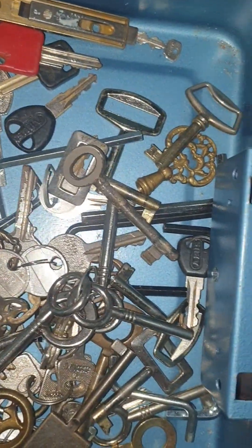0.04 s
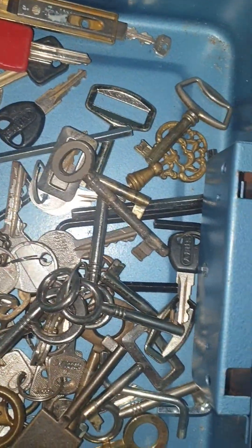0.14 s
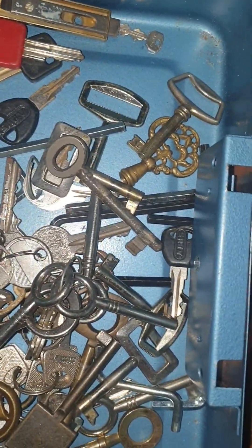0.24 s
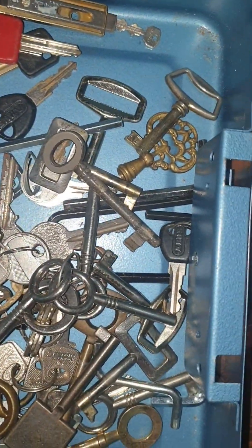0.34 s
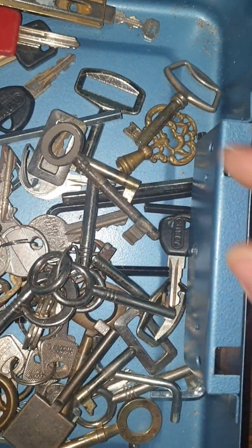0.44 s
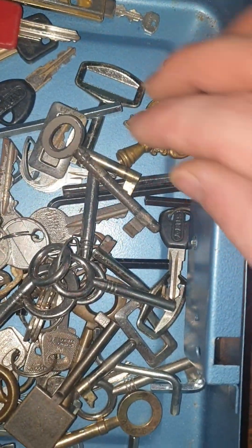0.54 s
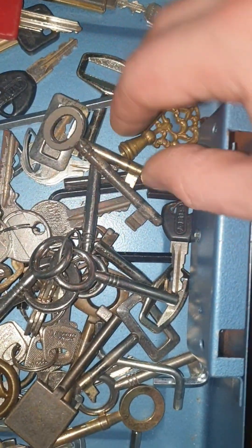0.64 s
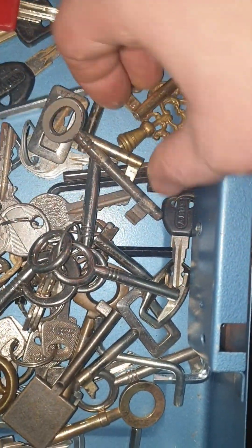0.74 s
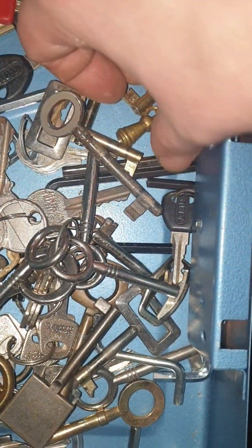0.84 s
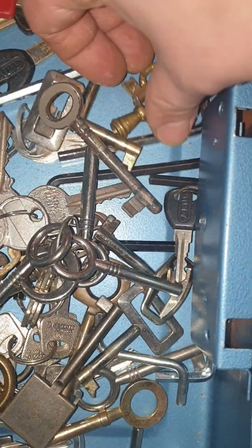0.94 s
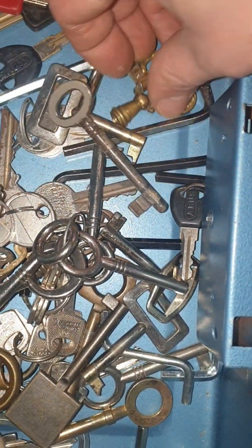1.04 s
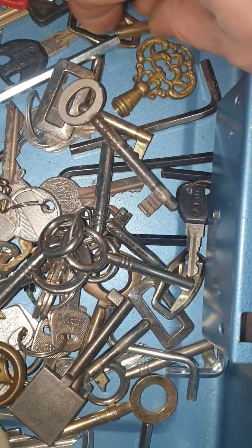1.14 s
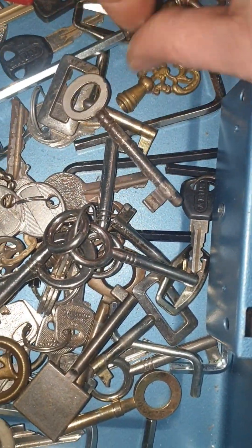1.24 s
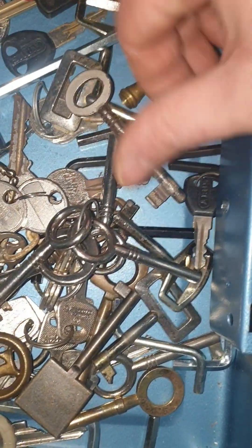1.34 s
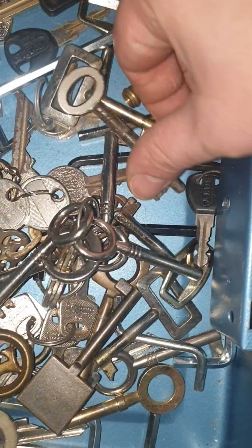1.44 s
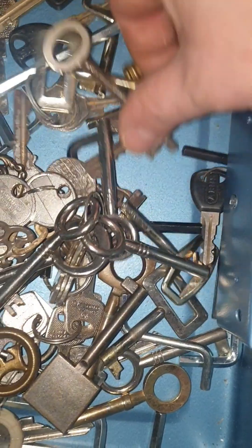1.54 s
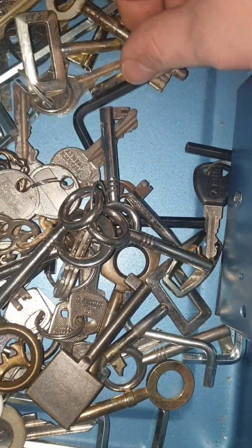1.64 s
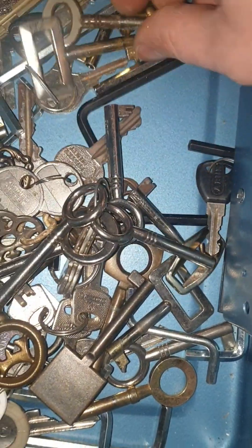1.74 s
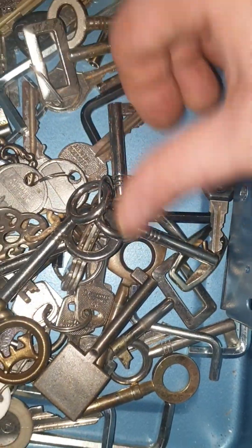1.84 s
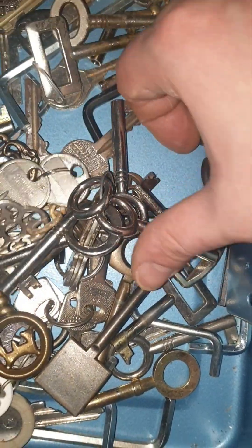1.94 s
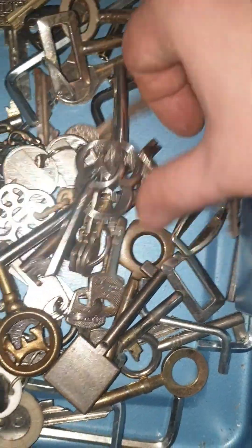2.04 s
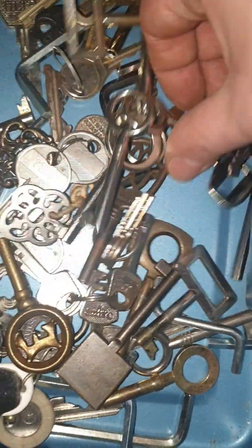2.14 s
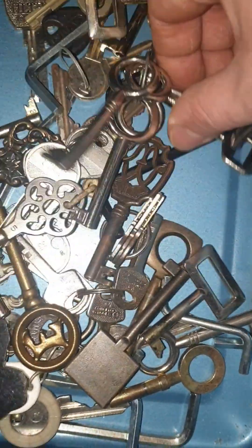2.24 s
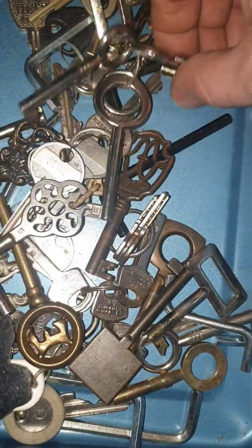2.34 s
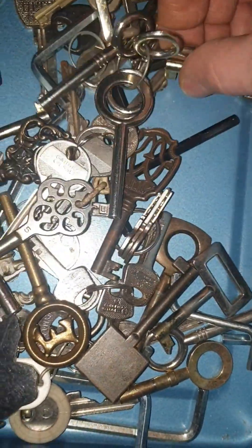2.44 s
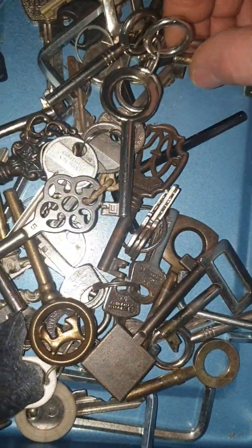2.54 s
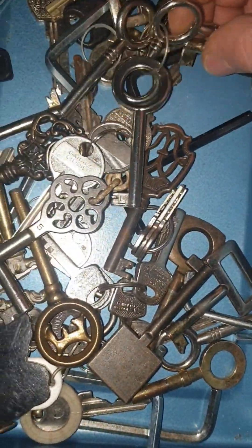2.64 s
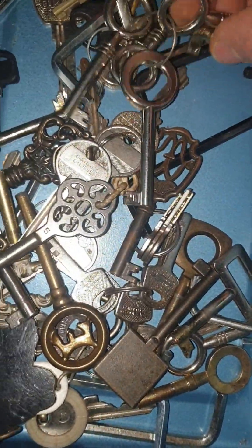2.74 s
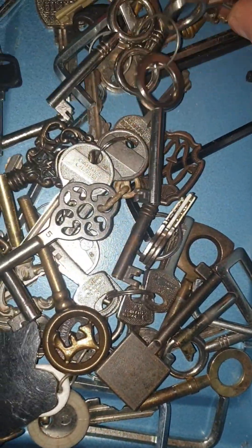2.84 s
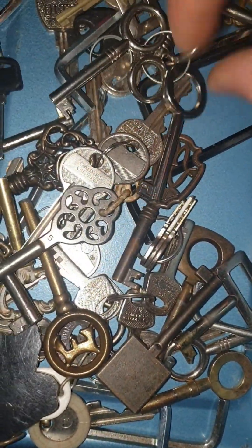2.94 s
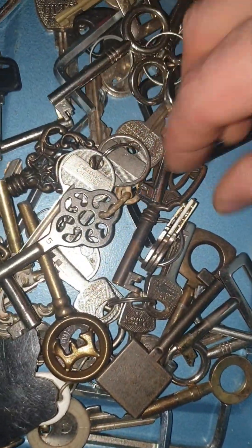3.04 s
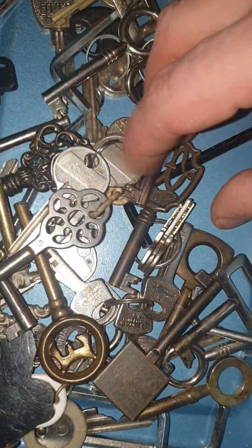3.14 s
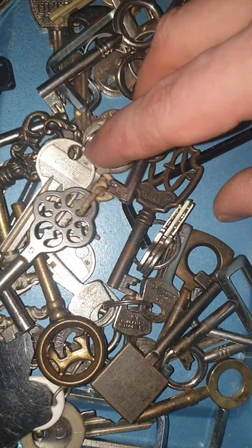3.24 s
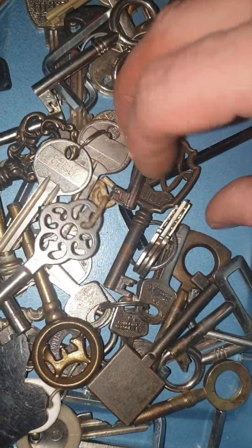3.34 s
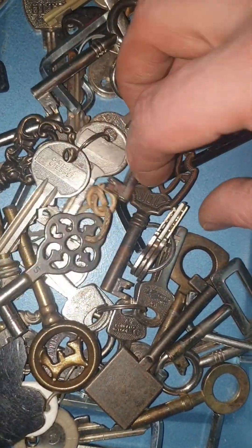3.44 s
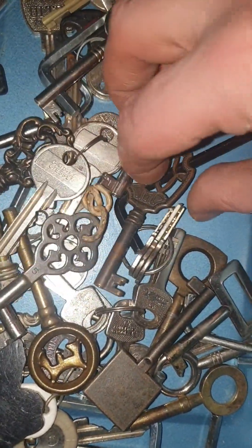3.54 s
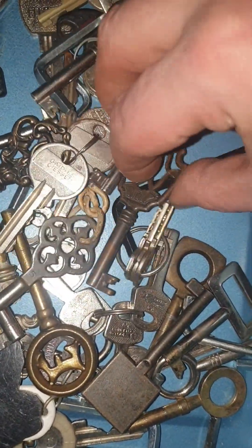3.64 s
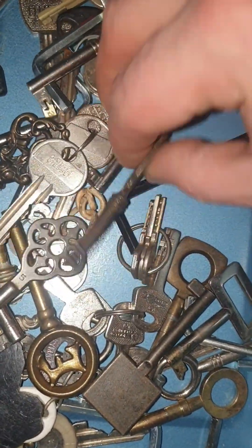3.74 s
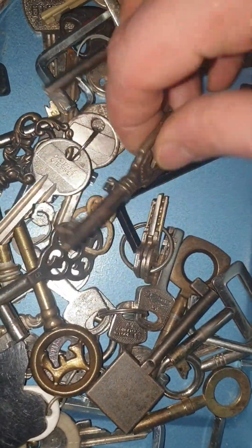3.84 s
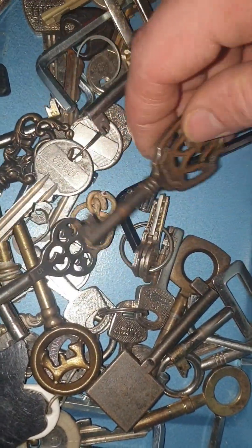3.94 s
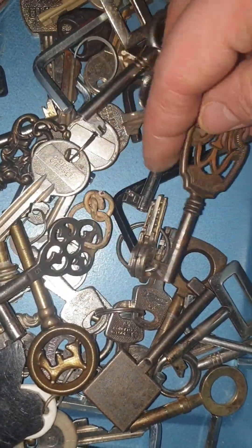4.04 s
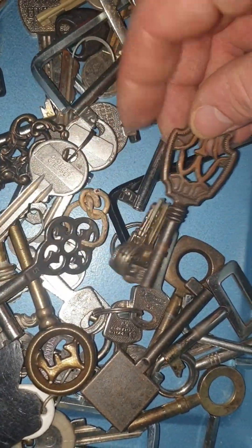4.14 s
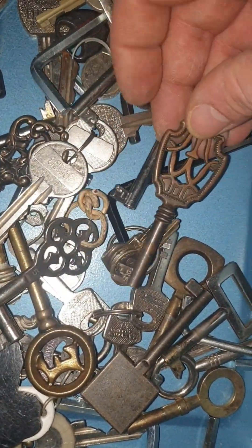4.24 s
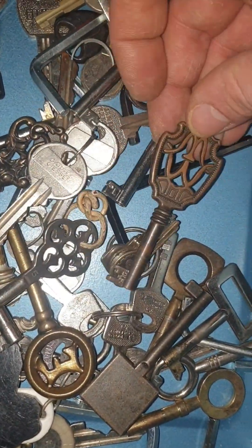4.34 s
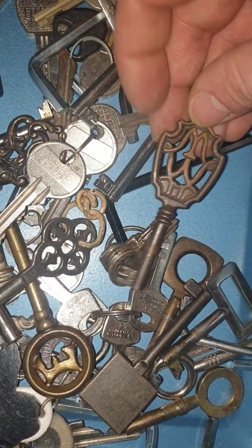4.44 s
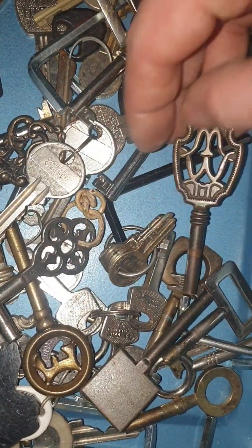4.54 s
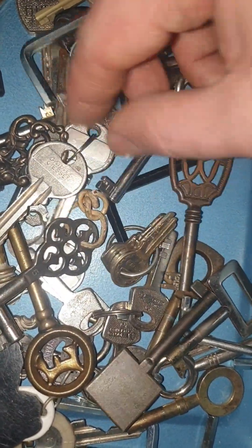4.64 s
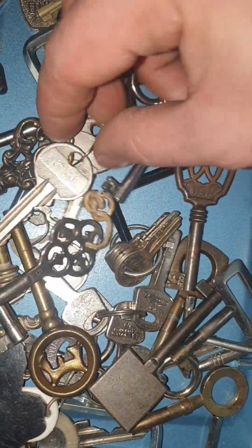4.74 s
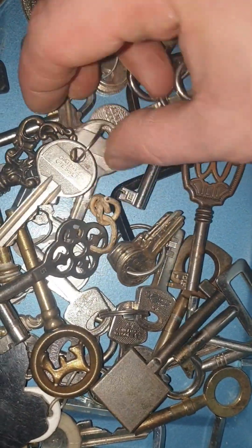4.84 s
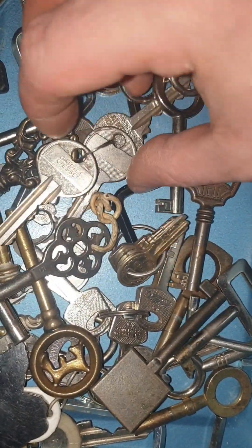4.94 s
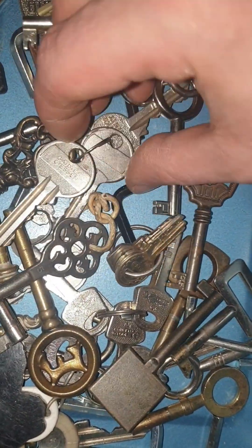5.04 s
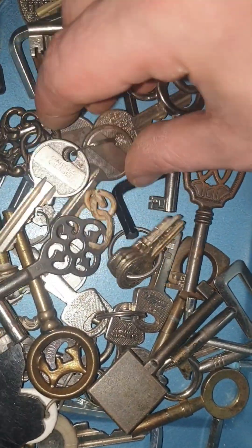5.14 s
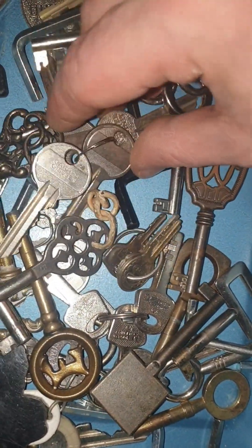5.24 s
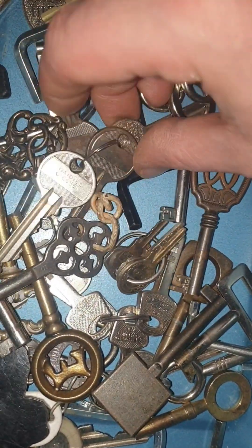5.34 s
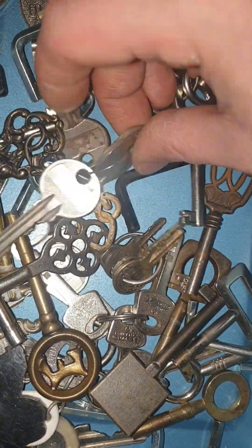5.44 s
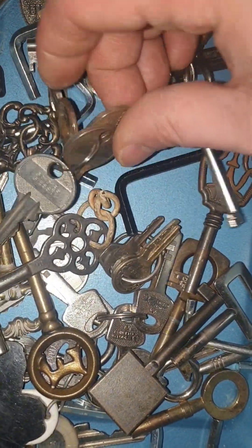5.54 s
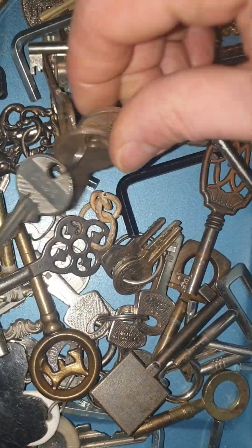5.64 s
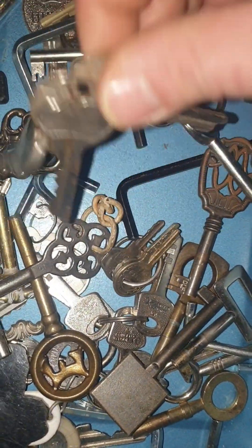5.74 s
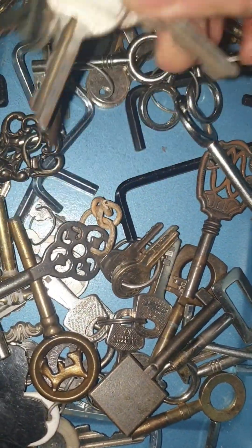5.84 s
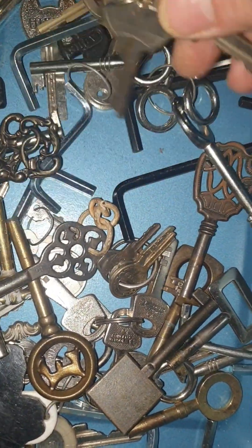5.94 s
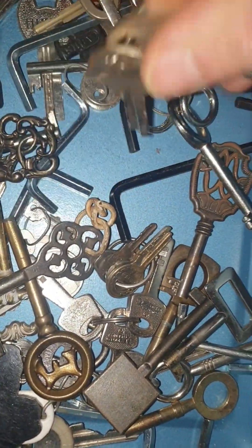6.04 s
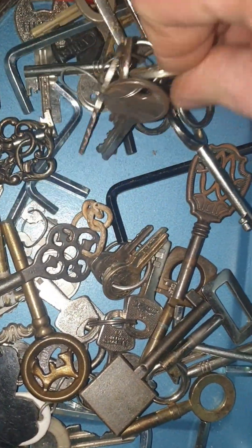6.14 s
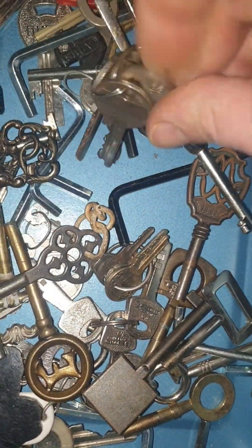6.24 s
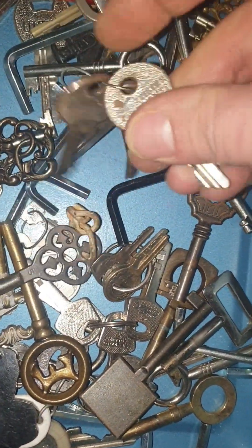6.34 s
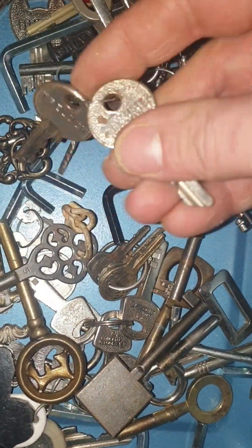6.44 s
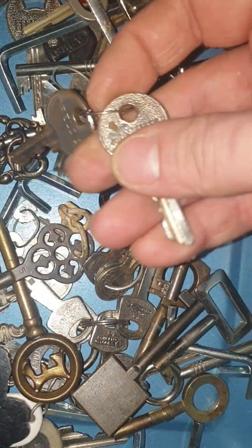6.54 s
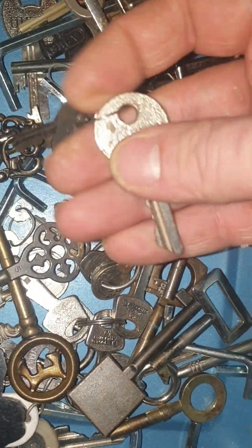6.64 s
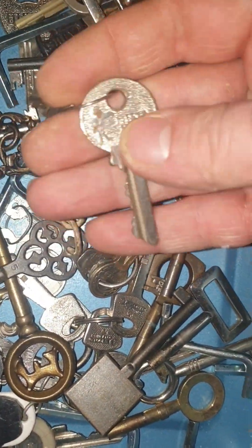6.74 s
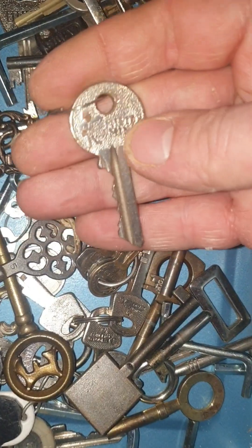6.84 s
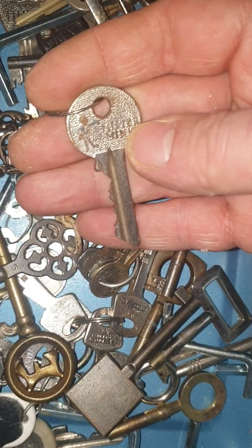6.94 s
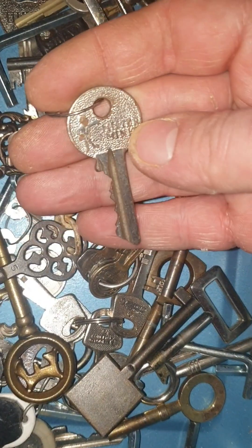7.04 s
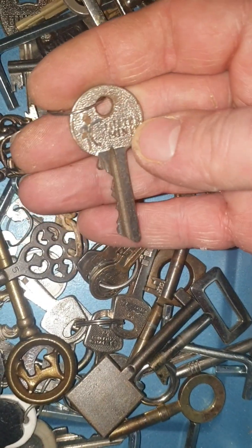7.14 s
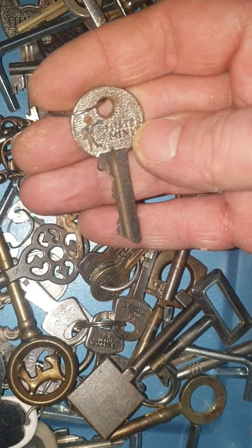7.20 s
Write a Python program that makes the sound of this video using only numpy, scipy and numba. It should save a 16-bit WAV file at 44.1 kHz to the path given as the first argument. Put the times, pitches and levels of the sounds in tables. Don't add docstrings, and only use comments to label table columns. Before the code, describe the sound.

A hand digs in a pile of old keys in a sheet-metal box, heard very close. Hard, bright clanks and rattling slides come first, then a bunch is lifted and dropped, a long key is dragged out more quietly, and flat keys are picked up with thin ringing tings. A last jingle settles into near silence. Short metallic box tail, quiet room, low handling rumble.

```python
import sys
import numpy as np
from numba import njit
from scipy import signal
from scipy.fft import rfft, irfft
from scipy.io import wavfile

SR = 44100
rng = np.random.default_rng(int(sys.argv[2]) if len(sys.argv) > 2 else 0)


def boost_factor(decibels):
    exponent = np.asarray(decibels, float) / 20
    return 10 ** exponent


def wav_out(sig):
    wavfile.write(sys.argv[1], SR, np.round(np.clip(np.atleast_2d(sig).T, -1, 1) * 32767).astype(np.int16))


N = 320607


def curve(table, hz):
    f, v = np.transpose(table)
    return np.interp(np.log(np.maximum(hz, 1)), np.log(f), v)


def unit(x):
    return x / np.sqrt(np.mean(x ** 2))


def band_noise(low_hz, high_hz):
    sos = signal.butter(3, [low_hz, high_hz], "bandpass", fs=SR, output="sos")
    return unit(signal.sosfilt(sos, rng.standard_normal(N)))


def swells(t, s, db, rise_s, held_s, fall_s, floor_db):
    since = t[:, None] - s
    off = np.maximum(-since / rise_s, 0) + np.maximum((since - held_s) / fall_s, 0)
    return np.maximum(np.max(db - 20 * off, axis=1), floor_db)


@njit(fastmath=True)
def ring(start, stop, pole, gain, soft, size):
    left, right = np.zeros(size), np.zeros(size)
    for m in range(len(start)):
        z, a, b, p, push = 1 + 0j, gain[0, m], gain[1, m], pole[m], 1.
        fade = min(6., np.log(1e5 * (abs(a) + abs(b))))
        for i in range(start[m], min(size, start[m] + int(-fade / np.log(abs(p))))):
            w = (1 - push) * z
            left[i] += a.real * w.imag + a.imag * w.real
            right[i] += b.real * w.imag + b.imag * w.real
            z *= p if i < stop[m] else .9975 * p
            push = push * soft[m] + 1e-30
    return np.stack((left, right))


# frequency in Hz, left minus right in dB.
PORT_BALANCE = [(60, -2.0), (110, 0.0), (200, -6), (380, 21.5), (700, 2.5), (1290, 12), (2380, 4),
                (4400, 1), (8120, 13.5), (11000, 9), (13000, -4)]


def strike(s, hz, db, t60, pan_db, turn, until=np.inf):
    rows = np.broadcast_arrays(s, hz, db, t60, pan_db, turn, until)
    s, hz, db, t60, pan_db, turn, until = (a.ravel() for a in rows)
    early = -2 * np.pi * hz * 0.0002457
    part = early + 2 * np.pi * turn * np.clip(hz / 1500, 0, 1) ** 4
    lean_db = (curve(PORT_BALANCE, hz) + pan_db) / 2
    left = boost_factor(db + lean_db) * np.exp(-.5j * part)
    right = boost_factor(db - lean_db) * np.exp(.5j * part)
    pole = np.exp(2j * np.pi * hz / SR - np.log(1000) / (t60 * SR))
    soft = np.exp(-1 / (SR * (0.0001 + 0.45 / hz)))
    return ring((s * SR).astype(np.int64), until * SR, pole, np.array([left, right]), soft, N)


# frequency in Hz, level in dB per Hz.
PILE_COLOUR = [(88, -45), (150, -78.5), (317, -8), (349, -17), (518, 12), (916, 15), (1560, 9), (1970, 14),
               (3700, 5.5), (4970, 4.5), (7000, -4), (8200, -17), (9300, -6), (10700, 0.5), (11600, -5.5),
               (15300, -13.5), (16500, -38)]


def handful(s, low_db, mid_db, top_db, pan_db, t60_s, scatter_db, chatter_s, count):
    u, v, w, late, turn = rng.random((len(s), 5, count)).transpose(1, 0, 2)
    hz = 260 + 15600 * ((np.arange(count) + u) / count) ** 1.6
    late = np.take_along_axis(late, (late[:, ::-1] * 5).astype(int), axis=1)
    wait = -np.log(1 - late)

    low = 1 / (1 + (hz / 1500) ** 4)
    top = 1 / (1 + (8000 / hz) ** 8)
    zone_db = low * low_db[:, None] + top * top_db[:, None] + (1 - low - top) * mid_db[:, None]
    t60 = np.clip(t60_s * (hz / 2000) ** -.2 * np.exp(0.99 * (w - .5)), .003, .2)
    share_db = 7.8 * np.log10(hz / 2000) - 10 * np.log10(t60 / t60_s * count)
    db = zone_db + curve(PILE_COLOUR, hz) + share_db + scatter_db * np.log(1 - v)
    start = s[:, None] + chatter_s * (1 - .6 * low) * wait
    return strike(start, hz, db - 2.23 * wait, t60, pan_db[:, None], turn - .5)


# frequency in Hz, level in dB per Hz.
HUSH_COLOUR = [(18, -29), (30, 1), (53, -3), (103, -26), (540, -35), (16000, -43)]


def hush():
    shape = boost_factor(curve(HUSH_COLOUR, np.fft.rfftfreq(N, 1 / SR)))
    return boost_factor(-85) * unit(irfft(rfft(rng.standard_normal((2, N))) * shape, N))


# start in seconds, peak in dB, box thud in dB re peak, treble in dB re peak.
TOUCHES = [(0.065, -56, 0, 0), (0.694, -14, -4, -2), (0.891, -36, -9, 3), (1.116, -9, -4, -6),
           (1.213, -26, -7, 3), (1.538, -8, -13, -9), (1.573, -7, -16, -3), (1.617, -7, -13, 1),
           (1.635, -9, -4, 0), (1.642, -12, -14, -1), (1.781, -30, -6, -13), (1.846, -28, -21, -17),
           (2.068, -4, -13, 0), (2.083, -10, -6, 9), (2.104, -17, -12, 0), (2.115, -18, -13, 7),
           (2.16, -15, -1, 2), (2.284, -20, -14, -15), (2.578, -37, -4, -18), (2.746, -25, -6, -1),
           (2.773, -15, 0, 2), (2.834, -25, -16, 2), (2.909, -11, -8, 1), (2.928, -15, -7, 13),
           (3.099, -26, -11, -1), (3.353, -33, 2, 5), (3.446, -28, -2, -13), (3.584, -33, -16, 4),
           (3.63, -30, -2, -8), (3.652, -23, -12, -5), (3.73, -23, -9, -10), (3.8, -35, 3, 4),
           (3.839, -16, -13, -3), (3.864, -21, -6, -8), (3.877, -25, 5, 4), (3.939, -30, 2, 10),
           (4.088, -28, -17, 4), (4.147, -27, 3, 8), (4.864, -21, -11, -9), (4.876, -21, -4, 4),
           (5.098, -25, -10, 16), (6.061, -34, -20, 17), (6.114, -40, -15, 16), (6.143, -6, -5, -3),
           (6.154, -11, -8, 5), (6.357, -35, -11, 22), (6.584, -30, -4, -19), (6.71, -26, -3, 6),
           (6.874, -32, -12, -7)]


def touches():
    s, db, thud, bright = np.transpose(TOUCHES)
    side = 3 * rng.standard_normal(len(s))
    return handful(s, db + thud + 1.5, db + 1.5, db + bright + 1.5, side, .018, 2.5, .002, count=70)


# start in seconds, boom in dB, held time in seconds.
LEANS = [(.07, -68, .02), (.45, -71, 0), (.66, -53, .51), (1.45, -51, .05), (1.82, -47, 0),
         (1.96, -50, .39), (2.9, -55, .06), (3.18, -62, .45), (3.8, -57, .21), (4.625, -47, 0),
         (4.83, -56, .34), (5.35, -54, .22), (6.16, -54, 0)]


def lean():
    boom, spread = band_noise(86, 120), band_noise(110, 850)
    now = np.arange(N) / SR
    steps = now[::128]
    s, db, held_s = np.transpose(LEANS)
    resting = (steps < .48) | ((steps > .6) & (steps < 6.6))
    level_db = swells(steps, s, db, .055, held_s, .14, np.where(resting, -83, -100))
    level = np.interp(now, steps, boost_factor(level_db))
    return level * (boom + boost_factor(6) * spread * np.array([[.8], [1.1]]))


# start in seconds, rattle in dB, build-up and settling in seconds per 20 dB.
SLIDES = [(.705, -27, .05, .12), (1.16, -27.5, .37, .125), (1.548, -9, .065, .11), (1.629, -15, .11, .14),
          (1.86, -44, .11, .11), (2.068, -10, .08, .18), (2.35, -25, .22, .07), (2.63, -39.5, .38, .11),
          (2.778, -16.5, .052, .09), (2.922, -7, .035, .06), (3.08, -35, .015, .75),
          (3.851, -23.5, .3, .135), (4.15, -30.5, .33, .062), (4.631, -9, .015, .06),
          (4.92, -21.5, .18, .063), (5.13, -30, .095, .105), (5.31, -33, .11, .125), (5.51, -26, .17, .3),
          (6.15, -15, .015, .07), (6.3, -45, .06, .6)]


def rattle():
    at, db, rise_s, fall_s = np.transpose(SLIDES)
    u, v, w, bright = rng.random((3600, 4)).T
    begin_s, end_s, still_db = .601, 7., -62
    s = begin_s + (end_s - begin_s) * u
    uneven_db = np.minimum(-3.0 * np.log(1 - v), 8)
    body = swells(s, at, db, rise_s, 0, fall_s, still_db) + uneven_db
    top = body - 9 + 10 * (bright - .5)
    return handful(s, body - 9, body - 6, top, 6 * (w - .5), 0.0097, 2, .0015, count=20)


# start in seconds, strength in dB, box thud in dB re strength, treble in dB re strength.
DIG_KNOCKS = [(.646, -18, -16.5, 5.5), (.688, -19, -14, -4), (.752, -27, -11.5, -4),
              (.833, -35.5, -.5, -1.5), (.917, -30, -11.5, -20), (.939, -21.5, -9.5, -.5),
              (1.012, -31.5, -3, -33.5), (1.055, -24, -9, -.5), (1.104, -22, -4, 0),
              (1.137, -14.5, -14, 2.5), (1.157, -19.5, -4.5, -9), (1.225, -30, -8, -5),
              (1.311, -38, -5, -43), (1.406, -29, -8, -6), (1.441, -15, -14, 7), (1.514, -17, -20, -3),
              (1.553, -28.5, -19.5, 21), (1.598, -11, -17, 2), (1.677, -19.5, -37.5, -6.5),
              (1.724, -30, -6, 12), (1.806, -29, -10, -1), (1.911, -31, -14, 9)]
LIFT_KNOCKS = [(1.949, -44.5, 9.5, 15.5), (1.985, -42.5, -3, 10), (2.014, -21, -9, -5), (2.031, -18, -6, 6),
               (2.052, -13.5, -14, 2.5), (2.147, -19.5, -5.5, 10.5), (2.188, -21.5, -14, -2),
               (2.244, -26, -12, -1), (2.318, -28, -11, -8.5), (2.33, -18, -5, 2.5), (2.43, -29.5, -36, 8),
               (2.444, -22.5, -3.5, 5), (2.474, -30, -14, 3), (2.503, -34, -6.5, -26.5),
               (2.606, -37.5, -5, 8), (2.627, -30.5, -10, 2), (2.726, -29.5, -13.5, 0),
               (2.768, -25, -14, 9.5), (2.812, -36, -28, 5.5), (2.872, -21, -3, 3), (2.895, -19, 0, 13.5),
               (2.997, -35.5, -11, -2)]
DRAG_KNOCKS = [(3.069, -27, -8.5, -7.5), (3.082, -30.5, -13, 1), (3.162, -31, -5.5, 1.5),
               (3.181, -28.5, -4.5, -5), (3.237, -33.5, -2.5, -1), (3.284, -33, -7, 6),
               (3.318, -27, -2, 5.5), (3.408, -47, -5, 1), (3.429, -33, -4, 4), (3.468, -27.5, -4.5, -14),
               (3.531, -29, -15, 1), (3.543, -32.5, -6.5, -24.5), (3.643, -33, -6, -8), (3.704, -39, 6, 0),
               (3.755, -26, -2, -9), (3.827, -30, -1, -4.5), (3.917, -22.5, -7, -4.5), (4., -39, -8, -26),
               (4.021, -39, -2, -7), (4.042, -25.5, -12.5, -8), (4.079, -31, -2.5, -4.5),
               (4.133, -37, -2.5, 4), (4.178, -35, -8, -2)]
PICK_KNOCKS = [(4.288, -54, -4.5, -21.5), (4.306, -49, -6, .5), (4.349, -55.5, 0, -13),
               (4.379, -56, 3.5, -16), (4.438, -46, -6, -8), (4.449, -37.5, -5.5, -4),
               (4.484, -38.5, 2.5, -.5), (4.518, -34, -2, 7), (4.549, -37.5, -.5, -2.5),
               (4.609, -13, -7, .5), (4.627, -17, -15, 3), (4.684, -27, -6, 0), (4.757, -26.5, -9, -1.5),
               (4.818, -17, -7.5, -2), (4.907, -19, -10, -2), (4.952, -16, -11.5, -3),
               (5.038, -31, -21, -4), (5.06, -34, 2.5, -11), (5.092, -22.5, -8.5, 6), (5.122, -27, -5, -47),
               (5.142, -23.5, -8, -5.5), (5.172, -28, -14.5, -5.5), (5.207, -40, -2, -29),
               (5.25, -42, -20, -30), (5.286, -37, 7.5, -11.5), (5.29, -19.5, -15, -5),
               (5.314, -21, -4, -.5), (5.389, -26.5, -12, -1.5), (5.405, -28.5, -4, 6),
               (5.467, -32.5, -5, -3.5)]
RAISE_KNOCKS = [(5.494, -23.5, -5, -.5), (5.511, -25.5, -12, 0), (5.545, -32, -.5, 2),
                (5.619, -19.5, -6.5, -6), (5.648, -32, -36, -7), (5.673, -30, -4.5, 1.5),
                (5.743, -30.5, -10.5, 2), (5.776, -58.5, -11.5, 29.5), (5.816, -23.5, -10, .5),
                (5.902, -56.5, -8.5, 33.5), (5.99, -32, -8, 13), (6.051, -42, -28, 22),
                (6.085, -65, -7.5, 37.5), (6.099, -46, -22, 28.5), (6.135, -11, -6, -.5),
                (6.262, -47, -4, 27), (6.293, -36.5, -14.5, 4), (6.322, -43, -12, 9),
                (6.368, -33.5, -2, 16), (6.412, -28, -6, -4), (6.425, -25, -1, 2.5), (6.461, -27, -2, -3),
                (6.51, -40, -4.5, -1.5), (6.546, -26, -9, 2.5), (6.637, -44, -2, 3), (6.697, -39, -6.5, 14),
                (6.729, -36.5, -7.5, -3.5), (6.804, -65, -21, 29), (6.845, -41, -13, -15),
                (6.863, -34, -3, -3)]
MORE_KNOCKS = [
    (.665, -23, -19, -6),
    (1.451, -10, -15, -7),
    (1.482, -31, -3, 11),
    (1.745, -31.5, -1.5, 4),
    (2.406, -32.5, -11, 6),
    (2.552, -59.5, 2, -9),
    (2.644, -63, 21.5, 3),
    (4.901, -27.5, 4, 7),
    (5.832, -27, -15.5, 1.5),
]


def knocks():
    rows = DIG_KNOCKS + LIFT_KNOCKS + DRAG_KNOCKS + MORE_KNOCKS + PICK_KNOCKS + RAISE_KNOCKS
    s, mid, thud, bright = np.transpose(rows)
    chance = rng.standard_normal((3, len(s)))
    side, low = 2 * chance[0], mid + thud
    splash = bright - 0.2 * np.clip(bright, 0, 30)
    crack = handful(s, low + 11.5, mid + 9, mid + bright + 9, side, 0.011, 3, 0.001, count=40)
    clank = handful(s, low + 6.5, mid + 4, mid + splash + 4, side, 0.041, 2.52, .008, count=110)
    floor = strike(s, 250 * (1 + 0.05 * chance[1]), low - 22 + 4 * chance[2], 0.27, 0, 0)
    return crack + clank, floor


def next_knock(t):
    rows = DIG_KNOCKS + LIFT_KNOCKS + DRAG_KNOCKS + PICK_KNOCKS + RAISE_KNOCKS
    every = np.sort([row[0] for row in rows] + [N / SR])
    return every[np.searchsorted(every, t + .03)]


# start in seconds, rumble in dB, held time in seconds.
SQUEEZES = [
    (.72, -63, .7),
    (1.83, -53, 0),
    (2.05, -33, .27),
    (2.49, -37, 0),
    (2.73, -62, .06),
    (3.05, -60, .3),
    (3.6, -66, .4),
    (4.6, -47, 0),
    (4.74, -68, .3),
    (6.16, -65, 0),
]


def grip():
    right, left = band_noise(38, 84), band_noise(45, 64)
    now = np.arange(N) / SR
    steps = now[::128]
    s, db, held_s = np.transpose(SQUEEZES)
    squeeze = np.interp(now, steps, boost_factor(swells(steps, s, db, .06, held_s, .08, -80)))
    return squeeze * np.array([boost_factor(-41.5) * left, boost_factor(.5) * right])


# start in seconds, frequency in Hz, level in dB, t60 in seconds.
GLINTS = [(1.138, 10300, -26, .04), (1.229, 9776, -48, .13), (1.229, 14600, -49, .12),
          (1.483, 15245, -47, .08), (1.553, 10900, -20, .04), (1.596, 13824, -27, .07),
          (1.676, 9790, -37, .2), (1.677, 14600, -47, .09), (1.68, 11584, -38, .08),
          (1.724, 12532, -43, .07), (1.732, 11930, -40, .05), (1.95, 11200, -39, .04),
          (2.083, 12532, -26, .08), (2.148, 9700, -24, .05), (2.142, 12600, -36, .12),
          (2.156, 14771, -31, .06), (2.225, 14857, -42, .05), (2.331, 14642, -34, .05),
          (2.365, 14000, -52, .2), (2.39, 14800, -48, .15), (2.405, 4300, -38, .07),
          (2.432, 10800, -28, .04), (2.444, 1000, -28, .03), (2.639, 3186, -41, .09),
          (2.762, 7407, -38, .07), (2.769, 14771, -35, .07), (2.895, 10800, -26, .12),
          (3.352, 10422, -44, .09), (3.843, 12962, -42, .04), (3.89, 9948, -38, .09),
          (4.148, 9500, -36, .05), (4.518, 13824, -40, .06), (4.627, 14600, -35, .16),
          (4.754, 9948, -44, .1), (4.817, 9948, -33, .07), (4.907, 11972, -35, .09),
          (4.908, 12575, -33, .09), (4.975, 13178, -50, .12), (5.744, 7019, -46, .12),
          (5.816, 13300, -32, .04), (5.87, 10520, -44, .1), (5.991, 12015, -47, .15),
          (6.15, 2450, -33, .22), (6.15, 1830, -36, .25), (4.685, 10560, -33, .2), (6.32, 11000, -40, .15),
          (6.43, 4400, -36, .08), (6.728, 7000, -42, .08), (6.728, 15400, -50, .12),
          (6.845, 14000, -44, .05), (6.845, 4450, -44, .09)]


def glints():
    s, hz, db, t60 = np.transpose(GLINTS)
    split, turn, side = rng.random((3, len(s)))
    pair = np.array([hz, hz * (1 + .012 * (split - .5))])
    pair_db = db - np.array([[0], [7]])
    return strike(s, pair, pair_db, t60 * np.array([[1], [.6]]), 4 * (side - .5), turn)


# start in seconds, frequency in Hz, level in
# dB, t60 in seconds.
FREE_KEYS = [(1.232, 4060, -31, 0.07), (1.408, 10250, -24, 0.045), (1.485, 9720, -28, 0.082),
             (1.596, 13840, -27.5, 0.076), (1.681, 9600, -31, 0.16), (1.816, 145, -30, 0.065),
             (2.361, 9850, -26.5, .28), (4.085, 10750, -28, .05), (4.132, 10550, -19, .07),
             (4.629, 8700, -27.5, .16), (4.633, 10270, -18, .2), (5.746, 13040, -38, 0.11),
             (6.051, 3110, -41, 0.2), (6.14, 1778, -34, 0.45), (2.36, 13120, -36, .25)]


def free_keys():
    s, hz, db, t60 = np.transpose(FREE_KEYS)
    return strike(s, hz, db, t60, 0, rng.random(len(s)), next_knock(s))


# start in seconds, ting in Hz.
SINGING_KEY = [
    (4.2, 10290),
    (4.66, 10680),
    (5.35, 10450),
    (5.6, 10800),
    (5.76, 10520),
    (6.12, 10640),
]
# frequency in Hz, level in dB re ting, ring time as a ratio to the ting.
SHAFT_MODES = [(6380, -25, 1.5), (7270, -28, 1.3), (3090, -30, 1.3), (9950, -20, .5), (11200, -21, .4),
               (10560, -12, .8)]


def tings():
    s, mid, _, bright = np.transpose(PICK_KNOCKS + RAISE_KNOCKS)
    chance = rng.standard_normal((4, len(s)))
    since, key_hz = np.transpose(SINGING_KEY)
    shaft_hz, shaft_db, shaft_time = np.transpose(SHAFT_MODES)
    hz = key_hz[np.searchsorted(since, s) - 1] * (1 + .004 * chance[0])
    free = 1 / (1 + np.exp((-bright - 3) / 5))
    neighbour = hz * (1 + 0.013 * chance[3])
    shaft = shaft_hz[:, None] * (1 + .003 * chance[2])
    family = np.vstack([hz, neighbour, shaft])
    db = mid + bright - 11 * (1 - free) + np.append([-6.5, -2], shaft_db)[:, None]
    t60 = (0.029 + 0.1 * free) * np.exp(0.22 * chance[1])
    t60 = t60 * np.append([1, .2], shaft_time)[:, None]
    return strike(s, family, db, t60, 2.5 * chance[0], chance[2], next_knock(s))


# frequency in Hz, t60 in seconds.
BOX_TAIL = [(200, 0.23), (600, 0.11), (1500, .18), (4000, 0.17), (10000, 0.135), (16000, 0.027)]


def box(wet_db, side_share):
    t, out = np.arange(int(SR / 3)) / SR, 0
    mid, side = rng.standard_normal((2, len(t)))
    for hz in 180 * 2. ** np.arange(7):
        edges = [hz / np.sqrt(2), min(hz * np.sqrt(2), 20000)]
        sos = signal.butter(2, edges, "bandpass", fs=SR, output="sos")
        apart = min(side_share * (hz / 1300) ** 2, 1)
        pair = signal.sosfilt(sos, [mid + apart * side, mid - apart * side]) / np.sqrt(1 + apart ** 2)
        out = out + pair * np.exp(-np.log(1000) * t / curve(BOX_TAIL, hz)) * (1 - np.exp(-t / 0.0013))
    return boost_factor(wet_db) * out / np.sqrt(np.sum(out ** 2) / 2)


def scene():
    hits, floor = knocks()
    hits = hits + rattle() + touches()
    clear = tings() + free_keys() + glints()
    send = (hits + 0.13 * clear).mean(0)[None]
    wet = signal.fftconvolve(send, box(-6, 1.0), axes=1)[:, :N]
    return hits + clear + floor + wet + grip() + lean() + hush()


def low_pass(x):
    return signal.sosfilt(signal.butter(12, 16800, fs=SR, output="sos"), x)


def record(dry):
    dry = signal.sosfilt(signal.butter(2, 40, "highpass", fs=SR, output="sos"), dry)
    dry = .9 * np.tanh(dry / .9)
    dry = signal.sosfilt(signal.cheby2(10, 40, 16250, fs=SR, output="sos"), dry)
    return low_pass(dry)


dry = scene()
out = record(dry)
wav_out(out)
```